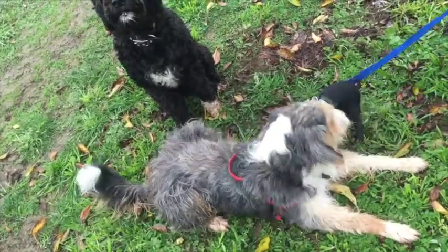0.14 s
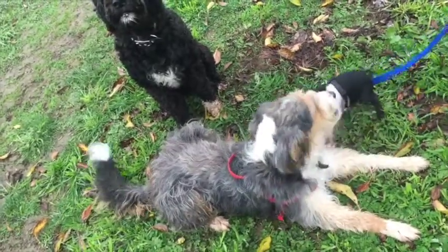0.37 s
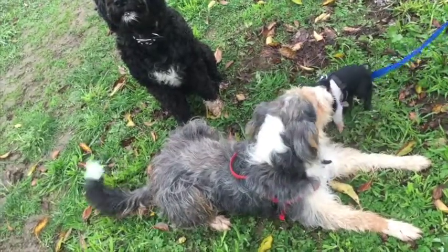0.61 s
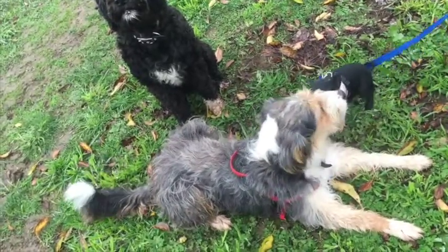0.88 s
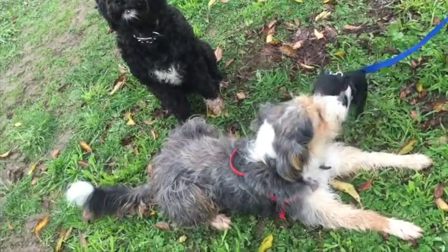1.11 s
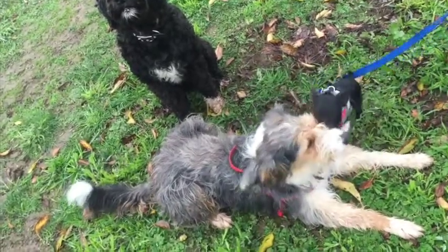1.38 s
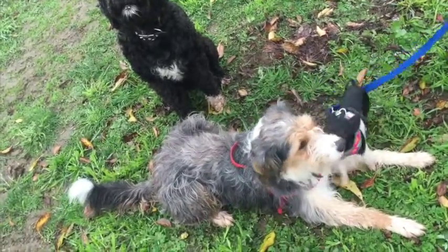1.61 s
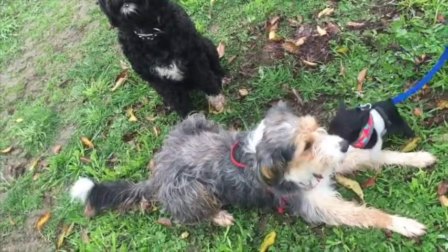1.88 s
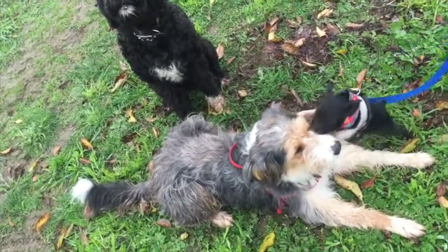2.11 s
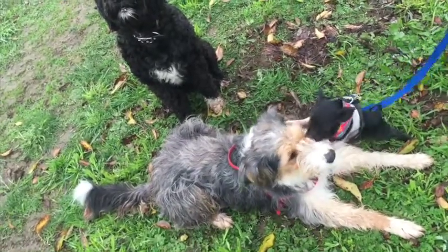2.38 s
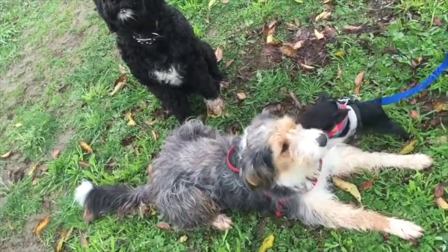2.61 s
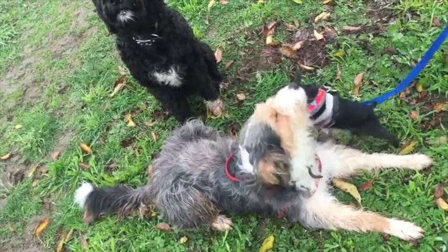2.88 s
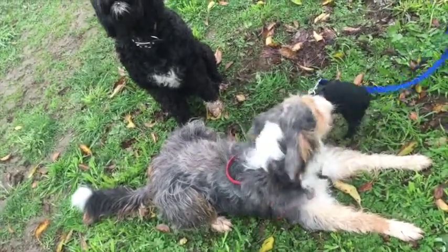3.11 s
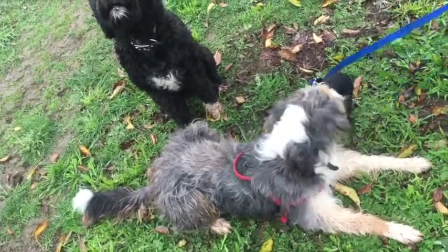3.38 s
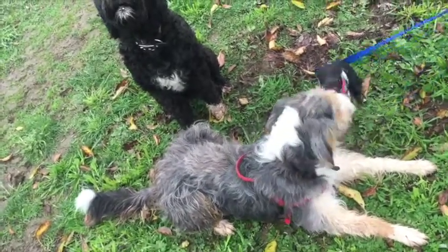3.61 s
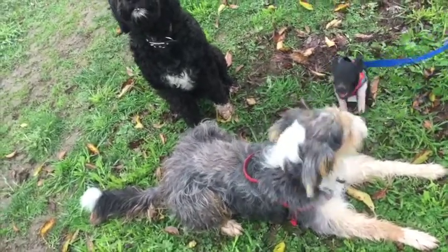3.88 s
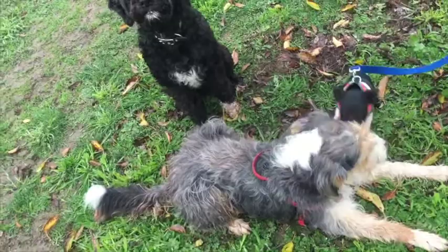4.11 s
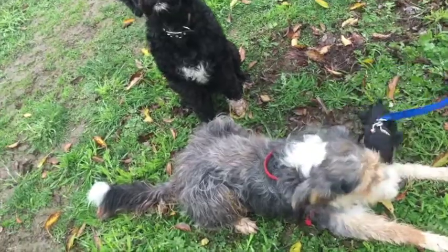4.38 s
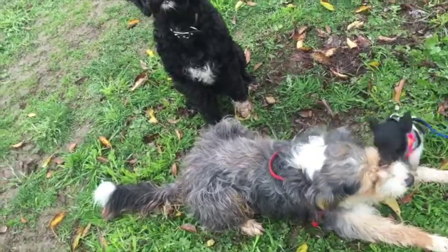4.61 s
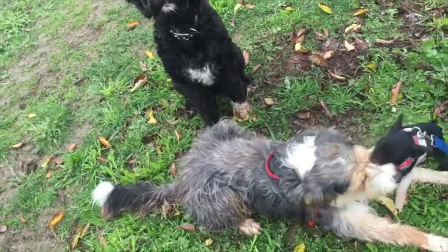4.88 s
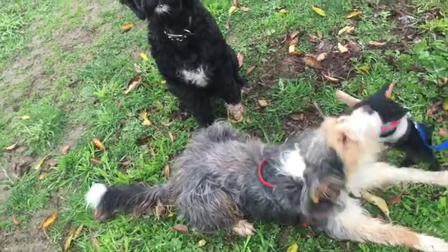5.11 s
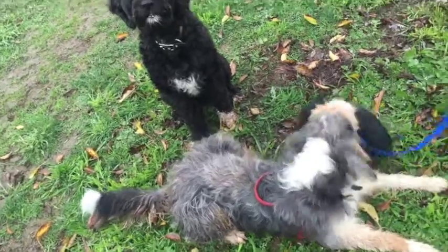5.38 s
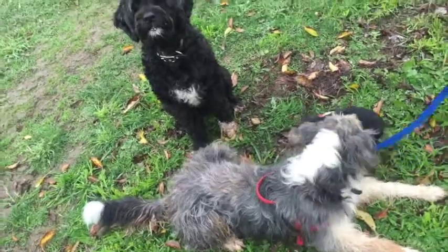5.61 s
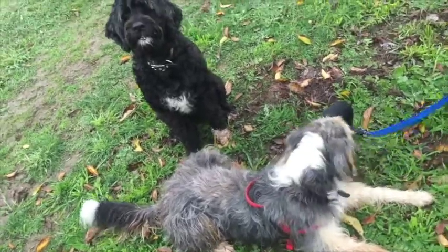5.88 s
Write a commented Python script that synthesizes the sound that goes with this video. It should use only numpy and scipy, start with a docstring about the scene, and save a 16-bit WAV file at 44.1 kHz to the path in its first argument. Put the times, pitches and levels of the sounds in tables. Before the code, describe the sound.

Outdoors on a lawn, close to playing dogs, with soft deep traffic rumble far away. At 0 s the thin echo of an earlier yap dies away. A big dog grunts in short, low, breathy bursts of about a tenth of a second, three or four each second, fuller around 0.6-1.3 s. After a tiny whine and creak, a puppy yaps at 1.5 s: clear, high, arched in pitch, very loud, gone by 1.65 s, with a faint echo from distant walls. Rustle and a click follow near 1.7-1.9 s; quieter grunts continue. Creaks lead into a second, slightly higher yap at 3.0-3.15 s, cracking near its end. From 3.5 s the grunts come thicker, with brushing fur and leash, a rasp at 3.8 s, a sharp click at 4.4 s and the harshest rattling growl-like grunt at 4.6 s. A minute tag jingle sounds at 4.84 s. Softer, low panting grunts and light ticks run to 6 s.

```python
"""On a lawn with walls far off, dogs play-fight. A puppy yaps twice, clear and high: harmonic stacks on arched
pitches, with breath and creaks. A big dog grunts in short panting bursts: uneven pulses ringing chest, throat
and mouth. Decaying noise throws the voices back, with the echo of one earlier yap at the start.
Shaped noise makes fur, leash, nose breath and far traffic; noise bursts tick and high modes jingle as a tag.
The microphone rounds off peaks, thumps faintly on overload and sinks its gain after loud sounds."""
import sys
import numpy as np
from scipy import signal
from scipy.fft import rfft, irfft
from scipy.io import wavfile
from scipy.ndimage import uniform_filter1d

SR = 44100
rng = np.random.default_rng(int(sys.argv[2]) if len(sys.argv) > 2 else 0)


def put_to_file(sound):
    """Save the sound as 16-bit audio at rate SR, in the file named by the first command-line argument."""
    columns = np.atleast_2d(sound).T  # one column per channel
    safe = np.clip(columns, -1, 1)
    whole_steps = np.round(safe * 32767)
    wavfile.write(sys.argv[1], SR, whole_steps.astype(np.int16))


def volts(x):
    """Linear amplitude factor 10**(x/20) for a level x in dB, scalar or array-like."""
    e = np.asarray(x, float) / 20
    return 10 ** e


N = 264644

# the big dog's grunts; the levels are those before the shape of a grunt is added:
# (start [s], length [s], fold rate near mid length [Hz], chest [dB], throat [dB], open mouth [dB])
GRUNTS = [(0.087, .11, 181.5, -50, -71, -95), (0.296, .07, 139.4, -72, -62.5, -71.5),
          (0.562, .13, 158.1, -45.5, -52.5, -72), (0.839, .11, 174.9, -45.5, -55, -61.5),
          (1.056, .08, 185.7, -46, -48.5, -52.5), (1.215, .09, 162.1, -48.5, -52, -51),
          (1.731, 0.065, 147.5, -51.5, -51.5, -74), (2.049, .07, 153.1, -48.5, -56, -64),
          (2.346, .11, 153.9, -49.5, -61.5, -68.5), (2.76, .1, 163.9, -44, -47, -52.5),
          (3.268, .11, 169, -48.5, -55.5, -78.5), (3.521, .12, 176.7, -41, -53.5, -64.5),
          (3.751, 0.13, 163.3, -41, -47, -53), (4.043, .12, 159.7, -44.5, -44.5, -53.5),
          (4.35, .11, 149.9, -46.5, -54, -57), (4.607, 0.1, 170.3, -47, -49.5, -49),
          (4.819, 0.14, 152.9, -56.5, -55, -68.5), (5.188, .105, 158.9, -47.5, -51, -57),
          (5.386, 0.15, 168.6, -43.5, -52.5, -65.5), (5.511, .09, 165.8, -53, -58.5, -73),
          (5.683, .11, 173.6, -43.5, -47, -62), (5.92, .12, 148.3, -45.5, -55, -73)]
GRUNT_SAG_HZ_PER_S = 120   # fall of the fold rate within a grunt
# resonances of the big dog's throat: (frequency [Hz], width [Hz], level [relative dB])
BIG_THROAT = [(410, 190, 1), (616, 140, 3), (860, 180, -6.5)]
# resonances of its mouth: (frequency [Hz], width [Hz], level [relative dB])
BIG_MOUTH = [(1160, 490, 3.5), (1915, 390, 5.5), (2400, 200, -11), (3990, 750, -7), (6000, 240, -6)]
# resonances of the puppy's throat: (frequency [Hz], width [Hz], level [relative dB])
PUPPY_THROAT = [(520, 240, 8), (1320, 380, -6), (1670, 990, -4), (2760, 1200, -17), (5470, 900, -13.5),
                (7194, 900, -18), (10200, 7000, -21.5)]


def rms_one(x):
    """Scale to rms 1."""
    return x / np.sqrt(np.mean(x ** 2) + 1e-20)


def lowpassed(x, hz):
    """Fourth-order roll-off above hz."""
    return signal.sosfilt(signal.butter(4, hz, fs=SR, output="sos"), x)


def bandpassed(x, edges_hz, order=2):
    """Pass the band between two edges."""
    return signal.sosfilt(signal.butter(order, edges_hz, "band", fs=SR, output="sos"), x)


def played(tables, levels):
    """Columns of several tables along time; level columns are silent between tables that lie apart."""
    t = np.arange(N) / SR
    s, *columns = np.transpose(np.concatenate(tables))
    sounding = sum((t >= rows[0][0]) & (t < rows[-1][0] + .011) for rows in tables) > 0
    fade = uniform_filter1d(sounding * 1., size=200)
    columns = [uniform_filter1d(np.interp(t, s, c), size=120) for c in columns]
    return [volts(c) * fade if k in levels else c for k, c in enumerate(columns)]


def at_hz(points, hz):
    """Read a spectrum on a log frequency axis."""
    known_hz, db = np.array(points).T
    return np.interp(np.log(hz), np.log(known_hz), db)


def drift(rate):
    """Slow chance: noise below about the given rate [Hz], rms 1."""
    r = np.exp(-2 * np.pi * rate / SR)
    return rms_one(signal.lfilter([1], [1, -2 * r, r * r], rng.standard_normal(N + SR))[SR:])


def tract(x, modes):
    """Parallel resonances with alternating signs."""
    out = 0
    for k, (hz, width_hz, db) in enumerate(modes):
        r = np.exp(-np.pi * width_hz / SR)
        poles = [1, -2 * r * np.cos(2 * np.pi * hz / SR), r * r]
        out = out + (-1) ** k * volts(db) * signal.lfilter([1 - r, 0, r - 1], poles, x + 1e-18)
    return out


def evened(x, size):
    """Divide by the running rms so that a level curve can shape the sound."""
    return x / np.sqrt(uniform_filter1d(x ** 2, size=size) + 1e-12)


def coloured(spectrum, patchy_db, rate):
    """Noise in half-octave bands, each flickering on its own; rms 1."""
    out = 0
    white = rng.standard_normal((2, N))
    for k, low_hz in enumerate(20 * 2 ** np.arange(0, 10, .5)):
        band = bandpassed(white[k % 2], [low_hz, low_hz * np.sqrt(2)])
        gain_db = at_hz(spectrum, low_hz * 2 ** .25) + patchy_db * drift(rate)
        out = out + volts(gain_db) * band
    return rms_one(out)


def shaped(starts, lengths, levels_db, shape):
    """Gain along time of events that share one shape: rise, slope, fall."""
    out = np.zeros(N + SR)
    risen, falls, first_db, second_db = shape
    edge_db = -24.5   # at both ends of a shape
    knees, knees_db = [0, risen, max(falls, risen), 1], [edge_db, first_db, second_db, edge_db]
    for s, length, db in zip(starts, lengths, levels_db):
        share = np.arange(round(length * SR)) / (length * SR)
        out[round(s * SR):][:len(share)] += volts(db + np.interp(share, knees, knees_db))
    return uniform_filter1d(out[:N], size=150)


def sagging(starts, lengths, rates, sag):
    """Value along time: each event passes its own value near mid length and sinks steadily."""
    s = np.ravel(np.transpose([starts, starts + lengths - .012]))
    ends = np.transpose([rates + sag * lengths / 2, rates - sag * lengths / 2])
    return np.interp(np.arange(N) / SR, s, np.ravel(ends))


def open_air():
    """Far traffic and open air: steady noise, strongest in the deep bass."""
    # spectrum: (frequency [Hz], density [relative dB per Hz])
    air_spectrum = [(12, -56), (20, -30.5), (46, -15.5), (81, -3), (130, -13), (150, -21.5), (262, -30),
                    (499, -47), (1190, -34), (1480, -40.5), (2390, -42.5), (7110, -50.5), (8890, -52.5),
                    (16000, -55)]
    return volts(-59) * coloured(air_spectrum, patchy_db=.8, rate=6)


def surroundings(voice):
    """Quick scatter from ground and bodies, wall echoes and a long thin tail: decaying noise responses."""
    # single wall echoes: (delay [s], level [relative dB])
    slaps = [(.17, -38.5), (.26, -45.5)]
    # what the walls return: (frequency [Hz], gain [dB])
    wall_colour = [(300, -10.5), (600, -3.5), (1200, -3.5), (1800, -5.5), (2400, 4), (3200, -3),
                   (5000, -18), (9000, -40.5)]
    # rasp of the earlier yap: (frequency [Hz], width [Hz], level [relative dB])
    earlier_throat = [(576, 160, 5), (1380, 420, 3), (1910, 420, 1.5), (2650, 1200, -8.5),
                      (4010, 1200, -11), (5900, 470, -8)]
    near_db, near_t60_s = -21.5, .3
    far_db, far_t60_s = -34.5, .87
    t = np.arange(SR) / SR
    near = volts(near_db - 60 * t / near_t60_s) * rng.standard_normal(SR) / np.sqrt(.01 * SR)
    far = volts(far_db - 60 * t / far_t60_s) * rng.standard_normal(SR) / np.sqrt(.046 * SR)
    far *= 1 - np.exp(-t / .026)   # the tail builds up gradually
    for delay, db in slaps:
        far += volts(db - 60 * np.abs(t - delay) / .031) * rng.standard_normal(SR) / np.sqrt(.0023 * SR)
    far = irfft(rfft(far) * volts(at_hz(wall_colour, np.arange(SR // 2 + 1) + 1)))

    # a hoarser yap that crested 0.13 s before the start leaves only its echo
    lead = SR // 2
    heard = np.concatenate([np.zeros(lead), voice])
    at = lead - round(.13 * SR)
    crest = np.argmax(uniform_filter1d(voice ** 2, size=2000))
    # the loudest yap, played 1.07 times as fast
    earlier = volts(-9) * np.interp(crest + 1.07 * np.arange(-3000, 3000), np.arange(N), voice)
    rasp = volts(-13) * np.hanning(6000) * rms_one(tract(rng.standard_normal(6000), earlier_throat))
    heard[at - 3000:at + 3000] += earlier + rasp
    return signal.fftconvolve(heard, near + far)[lead:lead + N]


def rustle():
    """Bright grainy noise of fur and leash; each brush swells and dies."""
    # brushes, rise and fall being times for 20 dB: (crest [s], level [dB], rise [s], fall [s])
    brushes = [(1.27, -66.5, 0.043, 0.078), (1.661, -59, .02, 0.29), (1.864, -53, 0.02, 0.012),
               (2.166, -72.5, 0.14, 0.022), (2.59, -74.5, 0.046, .05), (3.53, -67, 0.057, .1),
               (3.66, -55, .06, .035), (3.789, -56, .02, 0.059), (4.07, -56.5, 0.18, 0.076),
               (4.291, -71, 0.0087, .025), (4.39, -64.5, 0.027, .04), (4.5, -71.5, .2, 0.12),
               (4.601, -57.5, 0.0088, .055), (4.838, -57.5, 0.034, 0.13), (5.471, -63.5, 0.21, 0.079),
               (5.56, -67, .025, 0.036), (5.8, -75, 0.49, 0.71)]
    # spectrum: (frequency [Hz], density [relative dB per Hz])
    rustle_colour = [(880, -37), (1500, -2.5), (1920, 6), (2660, -5), (4330, -2.5), (10300, -9),
                     (15100, -15.5), (16000, -21)]
    t = np.arange(N) / SR
    level = 0
    for s, db, rise, fall in brushes:
        away = np.where(t < s, (s - t) / rise, (t - s) / fall)
        level = level + volts(db - 20 * np.minimum(away, 10))
    grain = volts(3 * drift(300))
    return level * rms_one(grain * coloured(rustle_colour, patchy_db=1.5, rate=25))


def ticks():
    """Leaves, teeth and buckles: noise bursts fading within milliseconds, each with its dull-sharp balance."""
    # (time [s], peak [dB], dull part [relative dB], sharp part [relative dB])
    tick_rows = [(0.2247, -48, -5, -21), (1.6871, -48.5, -10, -11), (1.8614, -34.5, -12.5, -22.5),
                 (1.921, -45, -28.5, -14.5), (2.159, -53.5, -30, -25), (2.5845, -52.5, -21.5, -12.5),
                 (3.1971, -47, 3.5, -13.5), (3.4993, -53.5, -17, -17), (3.6191, -47.5, -1.5, -16),
                 (3.6511, -61.5, -6.5, -22.5), (3.9554, -49, -0.5, -29), (4.2959, -39, -36.5, -15.5),
                 (4.3864, -32, 4.5, -23.5), (4.8187, -64, -10.5, -11), (4.8375, -54, -15, -18),
                 (5.3802, -47, -19, -14), (5.4806, -48.5, -2.5, -14), (5.5576, -46, -16, -8)]
    out = np.zeros(N + 600)
    burst = np.exp(-np.arange(600) / (.0015 * SR))
    noise = rng.standard_normal((len(tick_rows), 600)) * burst
    dull = bandpassed(noise, [1700, 3600])
    middle = bandpassed(noise, [4000, 14000])
    sharp = bandpassed(noise, [9000, 21000])
    for k, (s, db, dull_db, sharp_db) in enumerate(tick_rows):
        tick = volts(dull_db + 12) * dull[k] + middle[k] + volts(sharp_db + 10.5) * sharp[k]
        out[round(s * SR):][:600] += volts(db) * tick / np.abs(tick).max()
    return out[:N]


def tag():
    """Every touch of the collar tag rings its few high modes."""
    # touches: (time [s], level [relative dB])
    touch_rows = [(4.8367, -50.5)]
    # modes: (frequency [Hz], level [relative dB], t60 [s])
    tag_modes = [(12670, 0, 0.05), (14800, -1.5, 0.17)]
    touches, out = np.zeros(N), 0
    for s, db in touch_rows:
        touches[round(s * SR)] = volts(db - 8.5)
    for hz, db, t60 in tag_modes:
        r, w = volts(-60 / (t60 * SR)), 2 * np.pi * hz / SR
        ring = signal.lfilter([0, np.sin(w)], [1, -2 * r * np.cos(w), r * r], touches + 1e-18)
        out = out + volts(db) * ring
    return out


def nose():
    """Breath throbs through the big dog's nose with each grunt, at half the fold rate."""
    # resonances, passed twice: (frequency [Hz], width [Hz], level at each pass [relative dB])
    big_nose = [(3915, 410, 3), (5750, 240, 2), (6640, 570, -1), (8760, 570, -2.5), (11580, 830, -6.5)]
    # (risen at share of length, falls from share of length, level at the first [dB], at the second [dB])
    nose_shape = (0.39, 0.6, 0.6, -10.5)
    start, length, hz, *others, mouth_db = np.transpose(GRUNTS)
    rate = sagging(start, length, hz, GRUNT_SAG_HZ_PER_S) / 2 * (1 + .14 * drift(60))
    cycles = np.cumsum(rate) / SR
    throb = .058 + np.exp(-3 * (cycles % 1))
    breath = rms_one(tract(tract(throb * rng.standard_normal(N), big_nose), big_nose))
    return shaped(start, length, mouth_db - 4, nose_shape) * breath


def rattles():
    """Hard flaps in the harshest grunts: short noise bursts ring throat and mouth."""
    # (time [s], level [relative dB])
    rattle_rows = [(3.7728, -39.5), (3.7816, -34.5), (3.7955, -40), (4.0595, -34.5), (4.6029, -32),
                   (4.617, -32), (4.6324, -27), (4.6431, -31), (4.6557, -32), (4.6683, -32)]
    flaps = np.zeros(N)
    bursts = rng.standard_normal((len(rattle_rows), 130)) * np.exp(-np.arange(130) / 35)
    for (s, db), burst in zip(rattle_rows, bursts):
        flaps[round(s * SR):][:130] += volts(db + 7.5) * burst
    return tract(flaps, BIG_THROAT[1:] + BIG_MOUTH + [(8360, 1400, -22.5)])


def grunts():
    """Uneven strong-weak pulses ring the chest; each pulse lets a puff of air into throat and mouth."""
    # one shape each for all grunts:
    # (risen at share of length, falls from share of length, level at the first [dB], at the second [dB])
    chest_shape = (0.42, 0.77, -3, 0.5)
    throat_shape = (0.24, 0.76, 0.6, -6)
    mouth_shape = (.3, .7, -.1, -11)
    start, length, hz, chest_db, throat_db, mouth_db = np.transpose(GRUNTS)
    chest = shaped(start, length, chest_db, chest_shape)
    throat = shaped(start, length, throat_db, throat_shape)
    mouth = shaped(start, length, mouth_db, mouth_shape)

    # every second pulse is weaker (0-1), the more so the wider the mouth opens
    mouth_along = sagging(start, length, mouth_db, 0)
    weak = np.clip(.5 + .02 * (mouth_along + 62.5) + .2 * drift(2.7), 0, 1)
    rate = sagging(start, length, hz, GRUNT_SAG_HZ_PER_S)
    cycles = np.cumsum(rate * (1 + .065 * drift(60))) / SR
    odd = np.floor(cycles) % 2
    strength = (1 - weak * odd) * volts(2.5 * drift(70))
    pulses = strength * (np.diff(np.floor(cycles), prepend=0) > 0)
    puffs = (.54 * (1 - weak) + strength * np.exp(-3 * (cycles % 1))) * rng.standard_normal(N)

    thud = tract(tract(pulses, [(175, 200, 0)]), [(170, 56, 0)])
    thud = thud + volts(-42) * tract(pulses, [(254.7, 810, 0)])
    low = tract(.23 * rms_one(pulses) + rms_one(puffs), BIG_THROAT)
    low = lowpassed(tract(low, [(598.5, 600, 0)]), 1250)
    # the mouth's resonances are passed twice
    bright = tract(tract(.3 * rms_one(pulses) + rms_one(puffs), BIG_MOUTH), BIG_MOUTH)
    out = chest * evened(thud, size=1300)
    out = out + throat * evened(low, size=1300)
    return out + mouth * evened(bright, size=1300)


def whine():
    """A thin sinking tone through the closed muzzle."""
    # a soft lead-in: (start [s], length [s], pitch near mid length [Hz], level before its shape [dB])
    whine_rows = [(1.443, .045, 405, -52.5)]
    start, length, hz, db = np.transpose(whine_rows)
    pitch = sagging(start, length, hz, 900)   # sinks by 900 Hz per second
    tone = np.sin(2 * np.pi * np.cumsum(pitch) / SR)
    return np.sqrt(2) * shaped(start, length, db, (.5, 6.4, -3.8, -3.5)) * tone


def creaks():
    """Single flaps of the puppy's folds before a yap ring its throat."""
    # (time [s], level [relative dB])
    creak_rows = [(1.499, -45.5), (1.508, -30.5), (1.515, -26.5), (2.977, -43), (2.986, -39),
                  (2.995, -28.5), (3.004, -28.5), (3.009, -28)]
    flaps = np.zeros(N)
    for s, db in creak_rows:
        flaps[round(s * SR)] = volts(db + 22.5)
    flaps = lowpassed(flaps + 1e-18, 2300)   # a soft contact has little treble
    return tract(flaps, PUPPY_THROAT[:3])


def yaps():
    """A clear harmonic stack on an arched pitch, hoarser higher up, with breath gated by each cycle."""
    # one list a yap: (time [s], pitch [Hz], level [dB], treble against the level [relative dB])
    yap_rows = [
        [(1.512, 343.7, -38.5, -33), (1.528, 377.5, -24, -29.5), (1.55, 471, -18, -18),
         (1.57, 544.1, -14.5, -21), (1.584, 557.8, -9, -21.5), (1.596, 545.9, -12.5, -21.5),
         (1.61, 476.6, -25, -26), (1.64, 380.9, -42.5, -16.5)],
        [(3.0, 324.5, -38, -36.5), (3.02, 377.3, -21, -29), (3.04, 509.2, -15.5, -19),
         (3.05, 550.6, -10, -23.5), (3.062, 579.7, -9.5, -17), (3.08, 606.4, -12, -17.5),
         (3.098, 601.2, -13, -23), (3.112, 538.4, -17, -29.5), (3.13, 424.1, -37, -27),
         (3.145, 379.9, -42.5, -19)],
    ]
    # harmonics 1-5 as they pass the throat: (frequency [Hz], level [relative dB])
    yap_lows = [(300, -13), (420, -10.5), (480, -15.5), (560, -2), (620, -4), (760, -20.5), (950, -11),
                (1100, -15.5), (1220, -1), (1420, -9.5), (1650, -9), (1950, -8.5), (2200, -20), (2400, -7),
                (2600, -16), (2800, -25), (3000, -22)]
    # higher harmonics: (frequency [Hz], level [relative dB])
    yap_tops = [(1180, -33), (2000, -4), (2460, -2.5), (2970, -12.5), (3490, -12.5), (3900, -15),
                (5500, -22), (6090, -29.5), (9760, -35), (14100, -45), (15500, -47)]
    # the voice cracks: (time [s], half width [s], change of harmonics 1, 4 and 5 [dB], change of rasp [dB])
    cracks = [(3.098, 0.0038, -19.5, 12)]
    pitch, level, treble_db = played(yap_rows, levels=(1,))

    # the mouth shuts while the pitch falls (2 dB per Hz/ms), dulling harmonics 4, 5 and the hiss
    pitch_slope = uniform_filter1d(np.gradient(pitch) * SR / 1000, size=400)
    open_db = np.clip(2 * pitch_slope, -11.5, 0)
    low = np.array([volts(at_hz(yap_lows, k * pitch) + open_db * (k > 3)) for k in range(1, 6)])
    low = low * level / np.sqrt((low ** 2).sum(axis=0))
    whole = low.sum(axis=0)

    # slack folds at both ends of a yap hiss and rattle more, taut folds sing high
    slack = (560 / pitch) ** 2.5
    loose = np.clip(slack, 0, 2)
    high = level * volts(treble_db - 1.5) / loose ** 3
    hiss = level * volts(treble_db - 11 + .66 * open_db) * loose ** 2.5
    rasp = volts(-24)   # against the low harmonics
    for s, width, low_db, rasp_db in cracks:
        crack = np.exp(-((np.arange(N) / SR - s) / width) ** 2)
        low = low * volts(low_db * crack * [[1], [0], [0], [1], [1]])
        rasp = rasp * volts(rasp_db * crack)

    phase = 2 * np.pi * np.cumsum(pitch * (1 + .003 * drift(150))) / SR
    voice = sum(np.sqrt(2) * part * np.cos((k + 1) * phase - .96 * k) for k, part in enumerate(low))
    voice = voice * (1 + .065 * slack * np.cos(phase / 2))   # every second cycle differs
    upper = 0
    for k in range(6, 22):
        gain = volts(at_hz(yap_tops, k * pitch) + 3 * drift(60))
        upper = upper + gain * np.cos(k * phase + .6 * k * k + .022 * k * drift(250))
    breath = rng.standard_normal(N) * (1 + .84 * np.cos(phase))
    rough = slack * rasp * whole * rms_one(lowpassed(tract(breath, PUPPY_THROAT[:4]), 2700))
    # the hiss passes the upper resonances twice
    bright = hiss * rms_one(tract(tract(breath, PUPPY_THROAT[4:]), PUPPY_THROAT[4:]))
    return voice + high * evened(upper, size=300) + rough + bright


def scene():
    """Voices with their echoes over rustle and air."""
    voice = yaps() + creaks() + whine() + grunts() + rattles()
    return (voice + surroundings(voice) + nose() + rustle() + ticks() + tag() + open_air())[None]


def top_cut(x):
    """Nothing passes above the cut-off."""
    return signal.sosfilt(signal.butter(12, 16890, fs=SR, output="sos"), x)


def record(dry):
    """Peaks are rounded off, overload shifts the capsule with a faint low thump, gain sinks and recovers."""
    limit = .56   # amplitude that peaks approach
    duck_max_db, recover_db_per_s, attack_s, late_s = 7, 11, .02, .06
    over_db = duck_max_db * np.clip(np.abs(dry) / limit, 0, 1) ** 4
    ramp = recover_db_per_s * np.arange(N) / SR
    lag = np.exp(-1 / (attack_s * SR))
    # hold each peak and let it go at a steady rate in dB
    wanted_db = np.maximum.accumulate(over_db + ramp, axis=1) - ramp
    duck_db = signal.lfilter([1 - lag], [1, -lag], wanted_db)
    # the gain control answers late; the roll wraps the end's gain to the start
    held = dry * volts(-np.roll(duck_db, round(late_s * SR), axis=1))
    held = held / (1 + np.abs(held / limit) ** 6) ** (1 / 6)
    thump = bandpassed(held ** 6, [22, 60], order=1)
    return top_cut(held + volts(17) * thump)


dry = scene()
out = record(dry)
put_to_file(out)
```